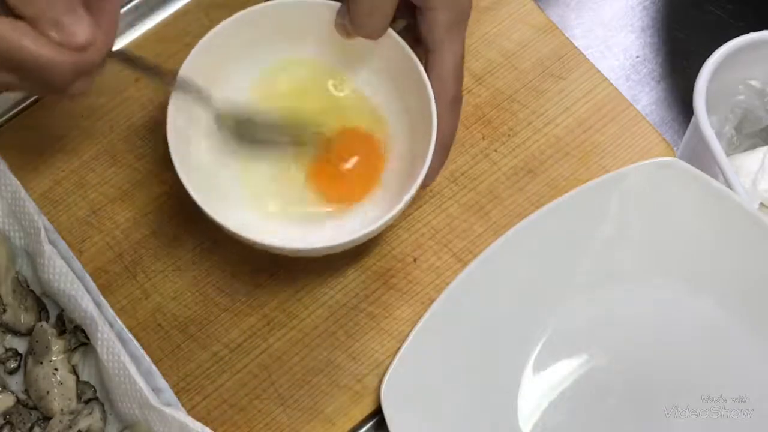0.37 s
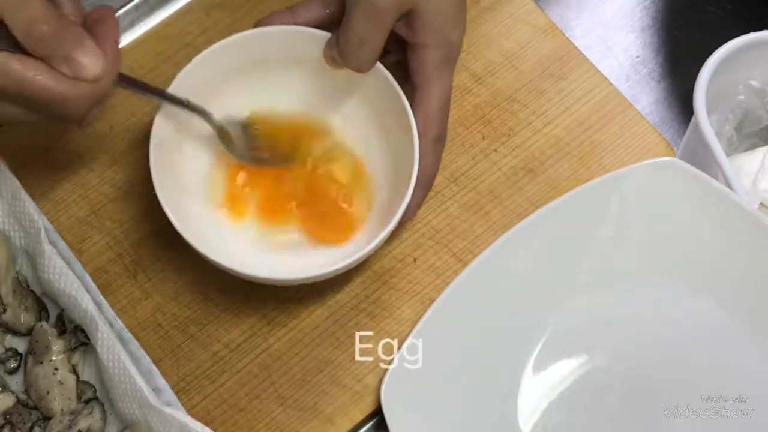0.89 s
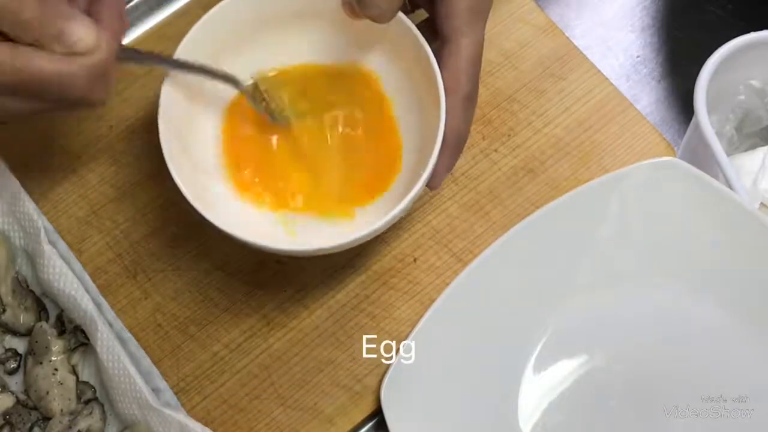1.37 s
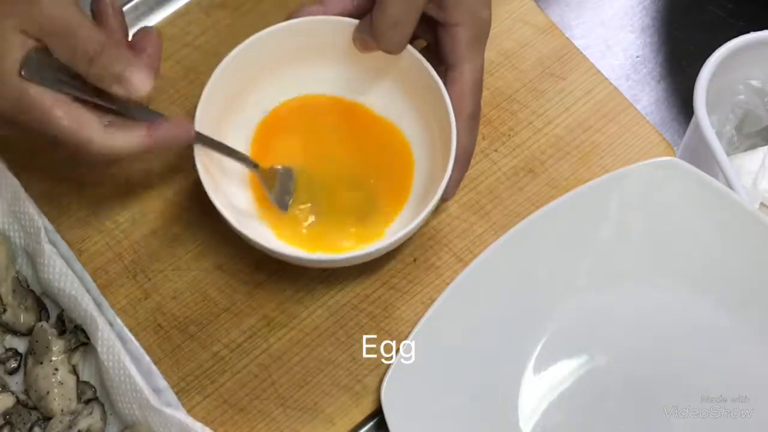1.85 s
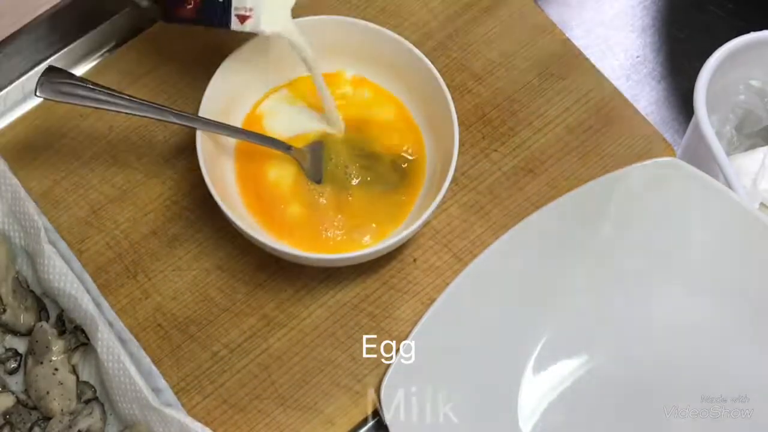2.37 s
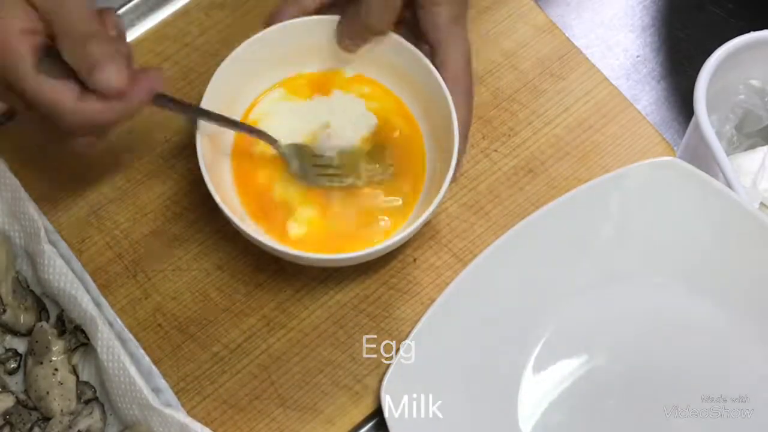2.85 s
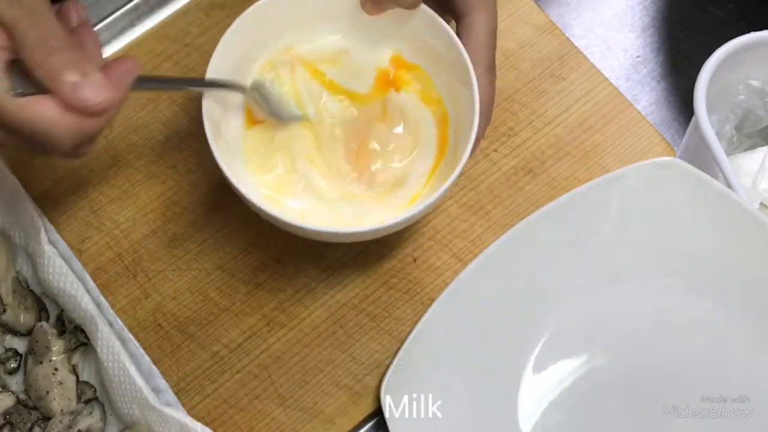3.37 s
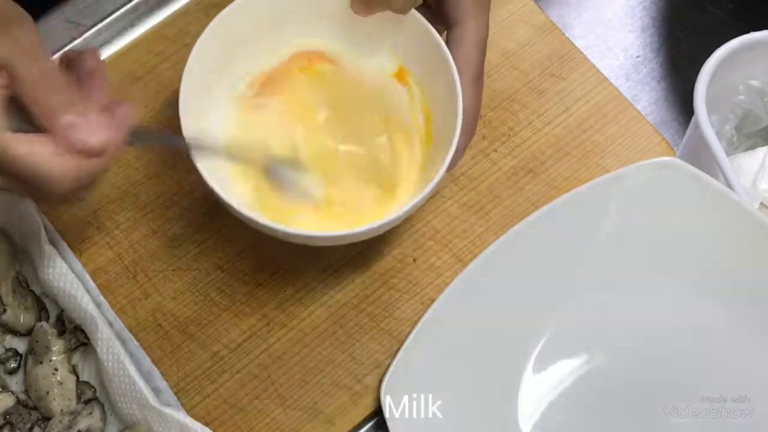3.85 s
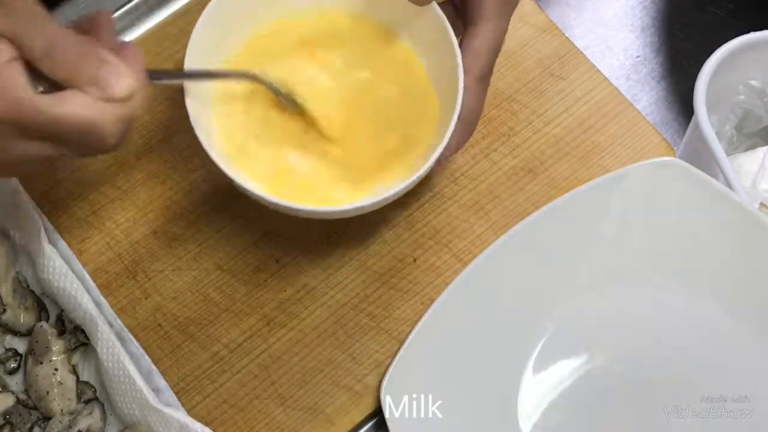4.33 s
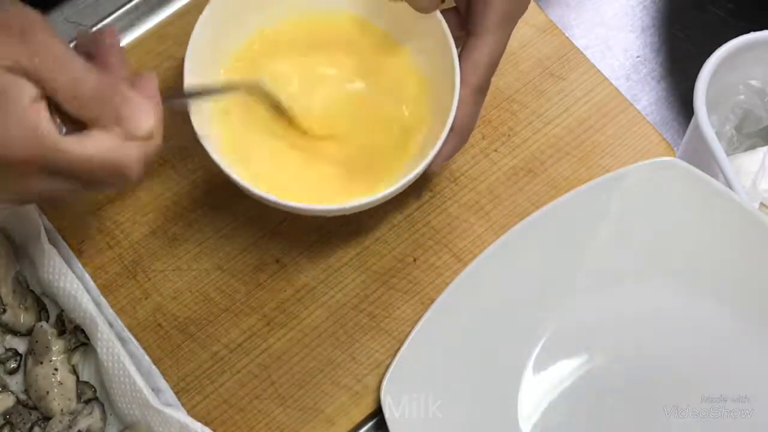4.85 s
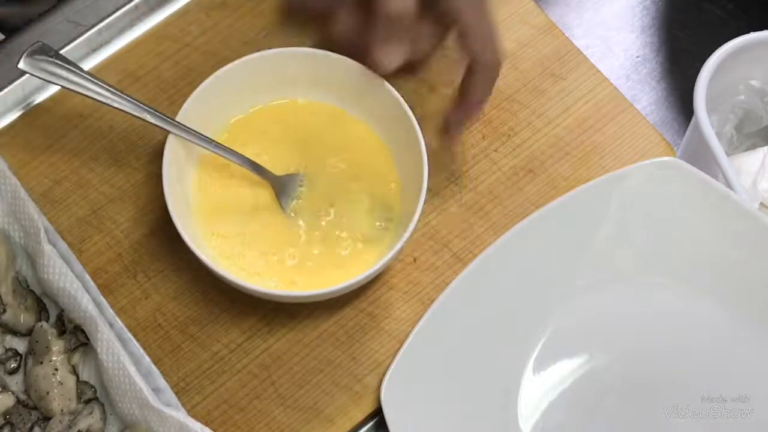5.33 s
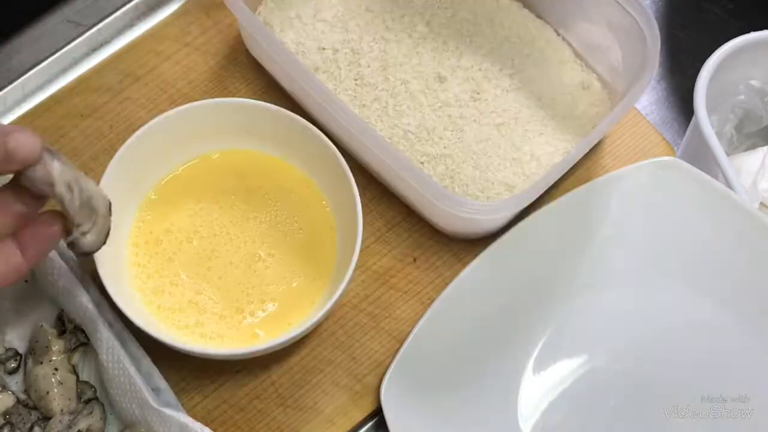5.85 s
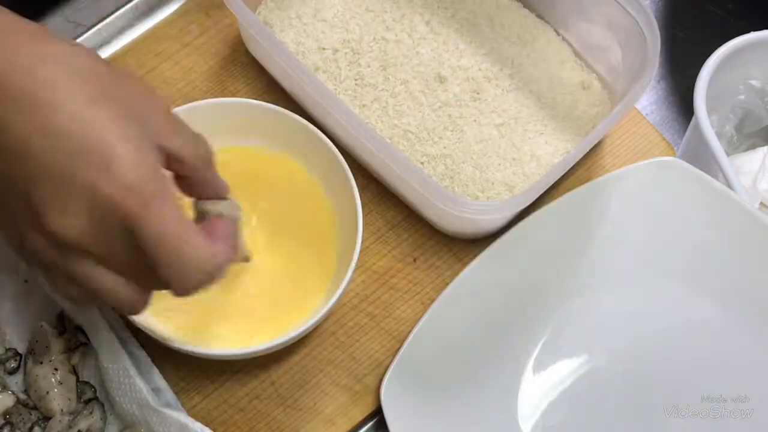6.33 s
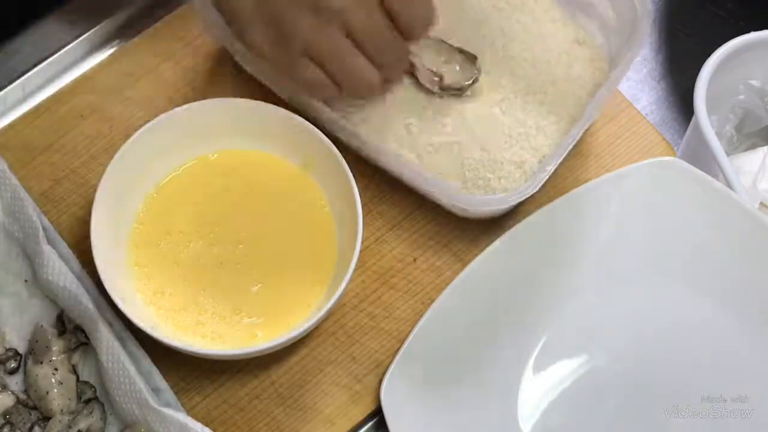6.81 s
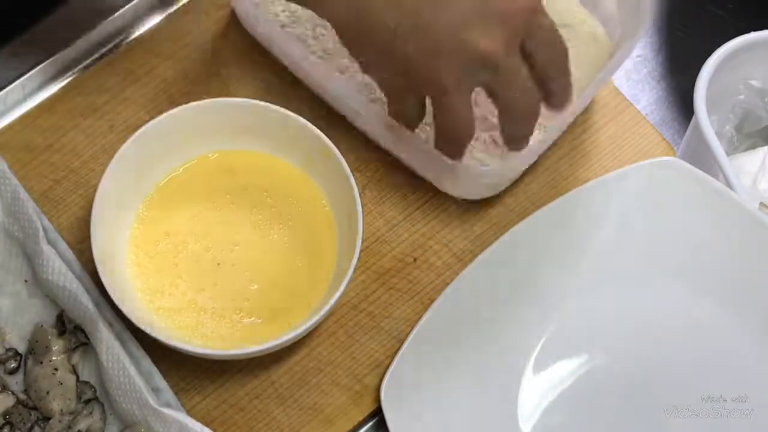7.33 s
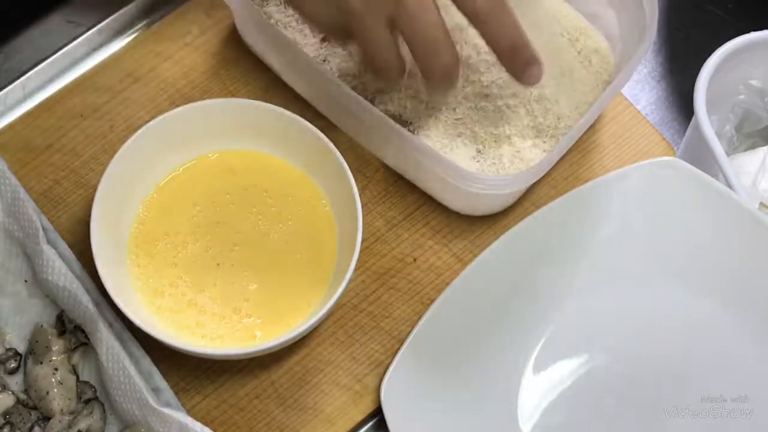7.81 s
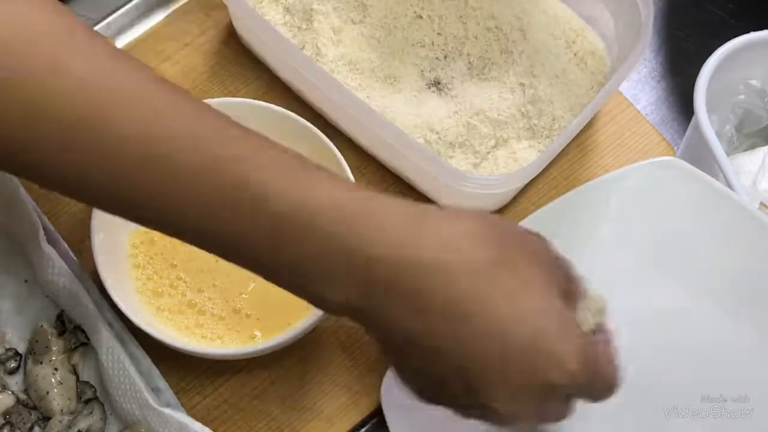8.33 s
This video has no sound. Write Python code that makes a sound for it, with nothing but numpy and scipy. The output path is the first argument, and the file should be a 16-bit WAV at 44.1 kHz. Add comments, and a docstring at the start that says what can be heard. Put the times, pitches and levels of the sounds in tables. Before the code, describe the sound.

Close, dry recording position over a wooden board: bright irregular fork ticks in a bowl, a couple of woody bowl knocks, a clink as the fork is let go. Quiet room hiss follows, then a short rim scrape and steady, rapid whisking with a low engine hum behind. It stops with a ringing clink and knock. The background becomes quieter, with small plastic thuds and light gritty crumb movements towards the end.

```python
"""In a kitchen, a fork whisks egg in a ceramic bowl on a wooden board: quick tine taps and a few bowl knocks.
Struck objects are decaying sines plus noise; a plastic tub then knocks, and crumbs slide as clumped grains.
Shaped noise makes the low rumble and ridged hiss; their colour and level switch at set moments.
A distant engine hums and briefly whines; low bumps are short decaying sines, some of them soft clicks
close to those switches."""
import sys
import numpy as np
from scipy import signal
from scipy.fft import rfft, irfft
from scipy.io import wavfile

SR = 44100
rng = np.random.default_rng(int(sys.argv[2]) if len(sys.argv) > 2 else 0)


def put_to_file(sound):
    """Save the sound as 16-bit audio at rate SR, in the file named by the first command-line argument."""
    columns = np.atleast_2d(sound).T  # one column per channel
    safe = np.clip(columns, -1, 1)
    whole_steps = np.round(safe * 32767)
    wavfile.write(sys.argv[1], SR, whole_steps.astype(np.int16))


def natural_amplitude(level_db):
    """Convert a level in decibels to a linear amplitude factor, elementwise."""
    exponent = np.asarray(level_db, float) / 20
    return 10 ** exponent


N = 382788
FREQ = np.maximum(np.fft.rfftfreq(N, 1 / SR), 1)

# tines on ceramic, levels before mixing: start_s, loudest_ring_hz, bowl_wall_db, fork_neck_db, tine_tips_db
TAPS = [(0.1984, 6300, -90, -44.5, -59), (0.211, 5320, -55, -44.5, -43.5), (.243, 11100, -82, -63, -43),
        (0.302, 7900, -57, -36.5, -50), (.393, 5700, -56, -35.5, -37), (0.4736, 6080, -70, -39.5, -42),
        (.478, 5200, -90, -41, -41), (0.4954, 7900, -71, -46.5, -62), (0.53, 3670, -51, -44.5, -75),
        (0.553, 5570, -62, -43.5, -44), (0.6317, 7200, -57, -44, -37), (0.6497, 9250, -63, -49, -62),
        (0.7101, 7680, -69, -37, -45), (0.784, 7900, -53, -42, -40), (0.865, 5820, -67, -43, -44),
        (0.9444, 5940, -61, -47.5, -35), (1.03, 9900, -85, -43.5, -45), (1.102, 8070, -68, -40.5, -37),
        (1.1185, 12600, -39.5, -36.5, -27), (1.121, 14900, -63, -48, -37), (1.2046, 2010, -40, -52, -64),
        (1.2115, 4110, -57, -28.5, -19), (1.233, 11020, -53, -35.5, -51), (1.3242, 15300, -36.5, -33, -28),
        (1.4225, 13400, -75, -54, -43), (1.4237, 2064, -36.5, -57, -37), (1.4291, 7900, -56, -29.5, -23),
        (1.43, 4090, -37.5, -29.5, -45), (1.44, 12800, -59, -53, -32), (1.5291, 2030, -39.5, -50, -77),
        (1.54, 2700, -52, -54, -38), (1.5498, 12340, -41.5, -33.5, -28), (1.6391, 7700, -41, -28.5, -18),
        (1.655, 4050, -56, -32, -34), (1.7352, 3950, -48, -53, -73), (1.7483, 4120, -49, -36, -25),
        (2.0098, 4740, -28.5, -31.5, -19), (2.035, 8340, -44, -56, -30), (2.04, 8550, -43, -35, -40),
        (2.7151, 3010, -43, -45.5, -41.5), (2.988, 6060, -76, -32.5, -29.5),
        (3.0775, 6000, -55, -39.5, -37), (3.1466, 5480, -49.5, -35.5, -32), (3.227, 9400, -48, -39.5, -38),
        (3.237, 4840, -65, -36.5, -35), (3.309, 5780, -79, -37, -30.5), (3.316, 4160, -62, -46, -57),
        (3.3625, 6070, -33.5, -30.5, -20), (3.379, 6200, -80, -37.5, -30), (3.3905, 5120, -78, -49, -39),
        (3.4647, 5640, -61, -39.5, -36), (3.539, 5700, -81, -29.5, -32), (3.6055, 5860, -72, -46.5, -74),
        (3.6182, 5680, -51, -34.5, -27.5), (3.696, 7750, -48, -35.5, -36), (3.754, 5400, -68, -51.5, -70),
        (3.7695, 8600, -74, -35.5, -31), (3.7788, 5380, -69, -36, -50), (3.7989, 1770, -38.5, -67, -66),
        (3.839, 4100, -61, -45, -62), (3.853, 5570, -73, -40, -65), (3.8554, 4900, -48, -54, -48),
        (3.903, 3250, -66, -46, -56), (3.9222, 9000, -56, -36.5, -29), (3.93, 4550, -62, -38, -60),
        (3.955, 3770, -58, -59, -66), (3.9914, 2580, -47.5, -36, -34), (4.0034, 5400, -82, -46, -42),
        (4.005, 6860, -66, -55, -46), (4.0446, 3020, -41.5, -39, -40), (4.0585, 3750, -50, -26, -29),
        (4.0664, 4950, -61, -51, -54), (4.131, 4750, -40, -37.5, -56), (4.1403, 5820, -38, -28.5, -32),
        (4.2159, 2980, -45, -30.5, -41), (4.227, 5340, -41, -29.5, -35), (4.297, 3820, -52, -45, -65),
        (4.3051, 5340, -42.5, -29, -41), (4.383, 3540, -44, -36, -30), (4.396, 5020, -45, -32, -34),
        (4.4628, 3430, -43, -32.5, -65), (4.478, 8000, -41, -32.5, -37), (4.4705, 2030, -51, -60, -70),
        (4.568, 5820, -41, -37, -38), (4.6525, 5670, -43.5, -36, -42), (4.741, 5340, -37.5, -39, -40),
        (4.8, 3500, -46, -54, -75), (4.8177, 3920, -48, -28.5, -46), (4.899, 5700, -40, -33, -41),
        (4.9819, 3990, -64, -33.5, -46), (5.12, 3640, -46, -37, -49), (5.138, 3800, -44.5, -49, -64),
        (5.202, 11070, -39, -35, -31), (5.2102, 3800, -36, -30, -29), (5.2814, 5100, -70, -49.5, -70),
        (5.3, 5100, -70, -55, -65)]
# centres of the tap bands: wall, two of the neck, tips: band_hz
TAP_BANDS_HZ = [2400, 5000, 9000, 13500]
# rings of fork and wet bowl at normal pitch: pitch_hz, relative_db, t60_s
FORK_BOWL_RINGS = [(2136, -1, 0.02814), (2700, -1.5, 0.029), (3025, 6, 0.049), (3500, 0.5, 0.045),
                   (3840, 2.5, 0.0061), (4740, -0.5, 0.037), (5340, 0.5, 0.047), (5620, -6, 0.06),
                   (6080, 6.5, 0.012), (7200, 0, 0.039), (7900, 8, 0.031), (9000, 7.5, 0.0092),
                   (9520, 2, 0.0343), (10080, -8, 0.022), (11150, -9, 0.042), (12400, 5.5, 0.013),
                   (12840, -6, 0.026), (12600, -4, 0.011), (15500, 5, 0.015), (17100, 2.5, 0.028),
                   (20280, 3.5, 0.027)]
# fork falling free against the rim and bouncing: start_s, low_rings_db, middle_ring_db, top_ring_db
FORK_DROPS = [(2.0092, -54, -43, -45), (2.039, -47, -52, -54), (5.203, -31, -35, -50),
              (5.2113, -38, -44, -52), (5.2238, -39, -44.5, -48.5), (5.233, -50.5, -46.5, -61.5),
              (5.2814, -59, -70, -65), (5.2985, -66, -71, -63)]
# borders between the low, middle and top rings of the free fork: border_hz
FORK_REGISTERS_HZ = [8500, 13000]
# rings of the fork out of the hand, at normal pitch: pitch_hz, relative_db, t60_s
FREE_FORK_RINGS = [(2310, -9, .14), (3130, -4, .05), (3650, 0, .06), (5200, -8, .04), (6150, -2, .05),
                   (11150, 2, .1), (11400, 0, .07), (16930, 3, .12)]
# board knock that comes with each tap, by knock band: relative_to_neck_db
THROUGH_BOWL_DB = [-37, -34.5, -29.5, -29.5, -34]

# bowl on board: start_s, thud_db, hardness_db_per_octave, foot_db, foot_ring_hz
BOWL_KNOCKS = [(0.109, -55.5, -4, -45.5, 2450), (0.803, -34, 6, -8, 2420), (1.917, -31.5, 4, -9.5, 1880),
               (2.011, -57, -1, -36, 2230), (2.043, -57.5, -5.5, -44, 1833), (2.8436, -51.5, 12, -28, 1400),
               (2.989, -55.5, 6, -48, 1100), (5.2196, -33.5, 4, -7.5, 2570),
               (5.279, -48.5, -2.5, -60, 2400), (5.29, -51, 0, -62, 2400)]
# rings of the board at normal pitch: pitch_hz, relative_db, t60_s
BOARD_RINGS = [(153.4, 5.5, 0.14), (280.6, -2.5, 0.26), (509.4, 9, 0.1), (814, -6, 0.033), (938, 5, 0.039),
               (1075, 4, 0.036), (1432, -15.5, 0.087), (2450, -12, 0.1), (3670, -6.5, 0.03)]
# plastic tub: start_s, thud_db, hardness_db_per_octave, click_db
TUB_KNOCKS = [(6.537, -55.5, 1, -56.5), (6.856, -71, -2, -59), (6.989, -36, 0.5, -40),
              (7.3874, -66, 17, -45.5), (7.408, -39, 4, -46.5), (7.434, -64, -3, -47),
              (7.597, -55, 0.5, -65), (8.633, -53.5, -5, -79)]
# rings of the tub: pitch_hz, relative_db, t60_s
TUB_RINGS = [(250, -1, .11), (441, 0, .08), (777, 2, .05), (1077, -6, .06), (1421, -2, .05),
             (1744, -8, .05), (2708, -8, .04), (3400, -3, .035), (4200, -8, .035)]
# centres of the knock bands, three for the thud and two for the click: band_hz
KNOCK_BANDS_HZ = [180, 530, 1100, 2400, 6500]
# colour of each knock in the three thud bands and two click bands: relative_db
BOWL_THUD_DB, BOWL_CLICK_DB = [-2, -2, -2], [-15, -20]
TUB_THUD_DB, TUB_CLICK_DB = [-5.5, -5, -5], [1.5, -2.5]

# low bumps and soft clicks, before the bass cut: start_s, level_db, pitch_hz, t60_s
BUMPS = [(.42, -65, 356, 0.3), (.49, -57.5, 356, 0.24), (2.008, -41, 385, 0.092), (2.019, -44.5, 214, 0.2),
         (2.035, -47, 343, 0.2), (2.1, -57, 350, 0.12), (2.099, -56, 213, 0.18), (2.215, -61, 35, 0.065),
         (2.866, -27.5, 66, 0.11), (2.8947, -15, 132, 0.01), (4.015, -65, 40, 0.052),
         (5.55, -56, 80, 0.079), (7.6, -51, 245, 0.18), (8.055, -62.5, 34.7, 0.052)]
# crumbs sliding, before clumping: start_s, gather_s, hold_s, peak_db
CRUMBS = [(7.044, 0.019, 0.025, -65), (7.088, 0.012, 0.09, -61), (7.184, .02, 0.065, -68.5),
          (7.431, 0.029, 0.013, -57), (7.576, 0.015, 0.005, -51.5), (7.717, 0.013, 0.041, -69.5),
          (7.767, 0.0092, 0.0076, -60.5), (7.785, 0.0089, 0.011, -58.5), (7.887, 0.029, 0.032, -54.5),
          (7.966, 0.019, 0.031, -73.5), (8.047, 0.0064, 0.0037, -59)]
# spectrum of the crumbs: frequency_hz, relative_density_db_per_hz
CRUMB_COLOUR = [(600, -24), (1200, -13.5), (1490, -8), (2500, -9), (3000, 0.5), (3800, -5.5), (4800, -1.5),
                (6200, -6), (13000, -8.5), (16000, -8.5)]

# the far engine revs: time_s, pitch_hz, level_db
WHINE = [(4.6, 1200, -90), (4.85, 1225, -73), (5.15, 1265, -73), (5.57, 1330, -76)]
# borders between the deep, low, upper and hiss registers: border_hz
ROOM_EDGES_HZ = [110, 800, 3300]
# smooth spectrum of the background: frequency_hz, relative_density_db_per_hz
ROOM_COLOUR = [(15, -68), (45, -42.5), (110, -11), (156, -5.5), (291, 0), (391, -0.5), (586, -7),
               (1500, -13), (2320, -22.5), (3290, -30.5), (5060, -32.5), (6990, -33.5), (15700, -35)]
# ridges, one list for each background stretch: centre_hz, lift_db
RIDGES = [
    [(150, 11), (5964, 5.5), (6782, 9), (8807, 5), (10766, 6.5), (12450, 7)],
    [(3165, 9), (5200, 9), (5900, 7.5), (6589, 4.5), (8161, 10.5), (8570, 6.5), (14556, 3)],
    [(172, 6), (5792, 7.5), (7041, 12), (7859, 5), (8850, 6.5), (10850, 7), (11498, 2.5), (12510, 4)],
    [(172, 3.5), (2130, 14), (2350, 11), (7062, 4.5), (7256, 4.5), (7838, 0), (10766, 1)],
    [(258, 6), (775, 5), (2304, 12), (4900, 4), (6200, -5), (7062, 7.5), (7730, 7), (8500, -3.5),
     (9700, 10), (10500, -1.5), (11283, 8), (12123, 10), (13120, 5), (13900, -3.5)],
    [(193, 10), (1593, 4.5), (5426, 5), (6782, 6.5), (7062, 8.5), (9151, 7), (12700, 8), (13329, 7)],
]
# narrow hums of a distant engine in the rumble: pitch_hz, lift_db
HUMS = [(152, 5), (207, 6.1), (290, 6.2), (480, 12), (575, 11.2), (665, 4.5)]
# background stretches, levels before wander: start_s, deep_db, hiss_db
STRETCHES = [(0.002, -78, -66), (.9, -66.5, -65.5), (2.219, -69, -66.5), (4.018, -68.5, -63.5),
             (5.574, -105, -72.5), (8.06, -81, -70.5)]
# swell of the distant rumble, used around its own mean: time_s, level_db
RUMBLE = [(0.0, -66), (0.6, -67), (1.93, -69), (2.64, -69), (2.95, -55.5), (3.55, -64), (3.92, -57.5),
          (4.3, -64.5), (5.15, -62), (5.44, -61.5), (5.58, -60), (5.7, -71), (6.89, -69.5), (7.2, -70),
          (7.52, -70), (7.98, -69.5), (8.24, -70), (8.68, -68.5)]
# low and upper rumble: mean_db, share of the swell; wander of all four registers: rms_db
RUMBLE_MEAN_DB, RUMBLE_SHARE, WANDER_DB = [-68, -78], [0.97, 0.64], [3.0, 2.4, 0.31, 0.31]
# brief dip in level: start_s, end_s
DIP_S = (4.009, 4.019)

# between these moments the fork, bowl and board modes are lower by this ratio and ring longer
SLOW_S, SLOW_RATIO = (.9, 2.22), .76
# ring cluster on the half-dry bowl, then once milk floods it: pitch spread (share), t60 (s)
FLOODED_S = 2.8
CLUSTER_SPREAD, CLUSTER_T60_S = (.045, .08), (.036, .028)


def rms_one(x):
    """Scales to unit rms."""
    return x / np.sqrt(np.mean(x ** 2) + 1e-20)


def in_time(rows):
    """Draws curve columns as sample-rate lines."""
    s, *columns = np.transpose(rows)
    return [np.interp(np.arange(N) / SR, s, column) for column in columns]


def at_hz(points, hz):
    """Reads a spectrum on a log-frequency axis."""
    point_hz, point_db = np.transpose(points)
    return np.interp(np.log(hz), np.log(point_hz), point_db)


def coloured(gain):
    """Fresh white noise with the given gain at each frequency."""
    return irfft(rfft(rng.standard_normal(N)) * gain, N)


def filtered(x, order, hz, kind):
    """Butterworth filter with the given edges in Hz."""
    return signal.sosfilt(signal.butter(order, hz, kind, fs=SR, output="sos"), x)


def add(out, s, piece):
    """Mixes a short sound in at time s."""
    i = round(s * SR)
    out[i:i + len(piece)] += piece[:N - i]


def is_slow(times):
    """Marks the moments when rings are lower and longer."""
    return (times > SLOW_S[0]) & (times < SLOW_S[1])


def ring(clicks, hz, t60):
    """A two-pole resonator: a unit click starts a decaying sine."""
    r, w = natural_amplitude(-60 / (t60 * SR)), 2 * np.pi * hz / SR
    return signal.lfilter([0, np.sin(w)], [1, -2 * r * np.cos(w), r * r], clicks + 1e-18)


def ping(hz, t60, rise_s):
    """One sine that swells briefly and decays."""
    t = np.arange(round(t60 * SR)) / SR
    return np.sin(2 * np.pi * hz * t) * natural_amplitude(-60 * t / t60) * (1 - np.exp(-t / rise_s))


def swell(start, rise_s, hold_s, peak_db, fall_db_per_s):
    """Enters 29 dB under its peak, rises, holds, then fades evenly in dB."""
    t = np.arange(N) / SR - start
    rise_db = -29 * np.maximum(1 - t / rise_s, 0)
    fall_db = -fall_db_per_s * np.maximum(t - rise_s - hold_s, 0)
    return (t > 0) * natural_amplitude(peak_db + rise_db + fall_db)


def grains(per_s, size_db):
    """Random clicks of uneven size."""
    sizes = natural_amplitude(size_db * np.minimum(rng.exponential(1, N), 5)) * rng.choice([-1, 1], N)
    return rms_one(sizes * (rng.random(N) < per_s / SR))


def struck(times, levels_db, bands_hz, modes, mode_db, spread_db, crack_db, crack_s, tail_db, tail_s,
           top_lag_s=0):
    """Each blow rings every mode at the level of its band, cracks, and leaves noise dying band by band."""
    at, out = np.round(times * SR).astype(int), np.zeros(N)
    chance = np.minimum(rng.standard_normal((len(at), len(modes))), 1)
    slow = is_slow(times)
    for ratio, chosen in [(1, ~slow), (SLOW_RATIO, slow)]:
        for k, (hz, own_db, t60) in enumerate(modes):
            band_db = np.array([np.interp(np.log(hz * ratio), np.log(bands_hz), row) for row in levels_db])
            blow_db = band_db + own_db + mode_db + spread_db * chance[:, k]
            clicks = np.zeros(N)
            clicks[at] = chosen * natural_amplitude(blow_db) * (-1) ** k
            out += ring(clicks, hz * ratio, t60 / ratio)
    middles = np.sqrt(np.multiply(bands_hz[1:], bands_hz[:-1]))
    edges = [bands_hz[0] ** 2 / middles[0], *middles, min(bands_hz[-1] * 2, .4 * SR)]
    for k, hz in enumerate(bands_hz):
        lag = round(top_lag_s * SR) * (hz == bands_hz[-1])   # the bright rattle follows the blow
        clicks = np.zeros(N)
        clicks[at + lag] = natural_amplitude(levels_db[:, k])
        longer = (3000 / hz) ** 0.45   # lows outlast highs
        shape = np.zeros(N)
        for db, t60 in [(crack_db, crack_s), (tail_db, tail_s)]:
            decay = natural_amplitude(-60 / (t60 * longer * SR))
            shape += natural_amplitude(db) * signal.lfilter([1], [1, -decay], clicks + 1e-18)
        noise = filtered(shape * rng.standard_normal(N), 2, edges[k:k + 2], "band")
        out += noise * np.sqrt(SR / 2 / (edges[k + 1] - edges[k]))   # makes up for the narrow band
    return out


def tap_levels(rows):
    """Level of each tap in each band: wall below, tips above, the neck strongest near the loudest ring."""
    loudest_hz = rows[:, 1:2]
    focus_hz = np.where(loudest_hz > 11000, 6220, loudest_hz)   # taps on the tips leave the neck near even
    away_octaves = np.abs(np.log2(np.array(TAP_BANDS_HZ[1:3]) / focus_hz))
    neck_db = rows[:, 3:4] - 7 * (away_octaves - away_octaves.min(axis=1, keepdims=True))
    return np.hstack([rows[:, 2:3], neck_db, rows[:, 4:5]])


def scattered_rings(rows, tap_db):
    """Scattered short rings at random pitches after each tap, the later ones weaker."""
    out = np.zeros(N)
    scatter = rng.random((len(rows), 10, 3))
    for s, band_db, rings in zip(rows[:, 0], tap_db, scatter):
        for pitch, late, weak in rings:
            hz = 2000 * 7.5 ** pitch
            level_db = np.interp(np.log(hz), np.log(TAP_BANDS_HZ), band_db) - 6 - 12 * weak - 14 * late
            add(out, s + .028 * late, natural_amplitude(level_db) * ping(hz, .02, rise_s=.0004))
    return out


def ring_clusters(rows, tap_db):
    """The struck spot lifts one ring, which wet ceramic splits into a rough cluster."""
    out = np.zeros(N)
    scatter = rng.standard_normal((len(rows), 6, 2))
    for s, hz, band_db, cluster in zip(rows[:, 0], rows[:, 1], tap_db, scatter):
        local_db = np.interp(np.log(hz), np.log(TAP_BANDS_HZ), band_db)
        wet = int(s > FLOODED_S)
        t60 = CLUSTER_T60_S[wet]
        add(out, s, natural_amplitude(local_db - 2) * ping(hz, t60, rise_s=.0005))
        for off, late in cluster:
            part = ping(hz * (1 + CLUSTER_SPREAD[wet] * off), t60, rise_s=.0012)
            add(out, s + .004 * late ** 2, natural_amplitude(local_db - 5 - 3 * late ** 2) * part)
    return out


def fork():
    """Tine taps ring fork and bowl, bounce weakly on another tine, and knock the board faintly."""
    rows = np.array(TAPS)
    start_s, neck_db, tap_db = rows[:, 0], rows[:, 3:4], tap_levels(rows)
    chance = rng.random((len(rows), 4))
    bounce_s = start_s + 0.0016 + 0.0093 * chance[:, 0]
    bounce_db = tap_db - 9 - 9 * chance[:, 1:2]
    brush_s = start_s + 0.036 + 0.055 * chance[:, 2]   # a dull brush as the fork sweeps on
    brush_db = tap_db - [24, 89.6, 36.3, 30] - 14 * chance[:, 3:]
    out = struck(np.concatenate([start_s, bounce_s, brush_s]), np.concatenate([tap_db, bounce_db, brush_db]),
                 TAP_BANDS_HZ, FORK_BOWL_RINGS, mode_db=-16.5, spread_db=6,
                 crack_db=-6.5, crack_s=0.008, tail_db=-24.5, tail_s=0.15)
    out += scattered_rings(rows, tap_db) + ring_clusters(rows, tap_db)
    knock = struck(start_s, neck_db + THROUGH_BOWL_DB, KNOCK_BANDS_HZ, BOARD_RINGS, mode_db=-12, spread_db=4,
                   crack_db=0, crack_s=0.0097, tail_db=-22.0, tail_s=0.0612)
    return knock + filtered(out, 4, 1600, "high")   # tines are too small for bass


def roughened(x, per_s):
    """Random level changes roughen the ring."""
    knots = np.arange(0, len(x) + SR / per_s, SR / per_s)
    return x * np.interp(np.arange(len(x)), knots, .5 + .8 * rng.standard_normal(len(knots)))


def dropped_fork():
    """Out of the hand the fork rings longer, at its own pitches, roughened by random level changes."""
    rows = np.array(FORK_DROPS)
    out = np.zeros(N)
    for (s, *levels_db), ratio in zip(rows, np.where(is_slow(rows[:, 0]), SLOW_RATIO, 1)):
        for hz, own_db, t60 in FREE_FORK_RINGS:
            register = np.searchsorted(FORK_REGISTERS_HZ, hz)
            level_db = levels_db[register] + own_db + 2 * rng.standard_normal()
            tone = ping(hz * ratio, t60 / ratio, rise_s=.0004)
            add(out, s, natural_amplitude(level_db) * roughened(tone, 350 * ratio))
    return out


def drag():
    """The fork is dragged off the rim: steel chatters over glaze, bright grit that also drives one ring."""
    grit = grains(15000, size_db=1.5)
    bright = filtered(grit, 2, 2000, "high")
    singing = natural_amplitude(3) * rms_one(ring(grit, 2300, .06))
    bite = swell(2.8645, rise_s=.002, hold_s=.008, peak_db=-40, fall_db_per_s=500)
    before_lift_off = np.arange(N) < 2.897 * SR
    return bite * before_lift_off * (bright + singing)


def knock_levels(rows, thud_db, click_db):
    """Level of each knock in each band: a thud tilted by its hardness below, a click above."""
    octaves = np.log2(np.array(KNOCK_BANDS_HZ[:3]) / KNOCK_BANDS_HZ[1])
    return np.hstack([rows[:, 1:2] + thud_db + rows[:, 2:3] * octaves, rows[:, 3:4] + click_db])


def bowl():
    """The bowl's foot knocks the board: a short ring, then the wood."""
    rows = np.array(BOWL_KNOCKS)
    levels_db = knock_levels(rows, BOWL_THUD_DB, BOWL_CLICK_DB)
    out = struck(rows[:, 0] + 0.00089, levels_db, KNOCK_BANDS_HZ, BOARD_RINGS, mode_db=-1.0, spread_db=2,
                 crack_db=-8.5, crack_s=0.062, tail_db=-24.0, tail_s=0.232, top_lag_s=0.0034)
    for s, _, _, foot_db, hz in rows:
        add(out, s, natural_amplitude(foot_db) * ping(hz, 0.0098, rise_s=0.00016))
    return filtered(out, 1, 10000, "low")   # a soft, wide contact


def tub():
    """Dull plastic knocks; the thin walls give no deep bass and no top treble."""
    rows = np.array(TUB_KNOCKS)
    levels_db = knock_levels(rows, TUB_THUD_DB, TUB_CLICK_DB)
    out = struck(rows[:, 0], levels_db, KNOCK_BANDS_HZ, TUB_RINGS, mode_db=-3, spread_db=2,
                 crack_db=-6.5, crack_s=0.044, tail_db=-27.5, tail_s=0.084)
    return filtered(out, 4, [160, 10000], "band")


def crumbs():
    """Thousands of dry grains a second, arriving in clumps; each slide has its own uneven colour."""
    colour = natural_amplitude(at_hz(CRUMB_COLOUR, FREQ))
    clump_knots = natural_amplitude(2.65 * rng.standard_normal(N // 250 + 1))
    clumps = np.interp(np.arange(N), np.arange(0, N, 250), clump_knots)
    patter, out = rfft(grains(7000, size_db=2.2)), np.zeros(N)
    shade_hz = np.geomspace(500, 16000, 40)
    for row in CRUMBS:
        shade_db = 3 * rng.standard_normal(40)
        shade = natural_amplitude(np.interp(np.log(FREQ), np.log(shade_hz), shade_db))
        out += swell(*row, fall_db_per_s=600) * rms_one(irfft(patter * colour * shade, N))
    return clumps * out


def bumps():
    """Short decaying low sines, some of them soft clicks close to the switches between stretches."""
    out = np.zeros(N)
    for s, level_db, hz, t60 in BUMPS:
        add(out, s, natural_amplitude(level_db) * ping(hz, t60, rise_s=0.23 / hz))
    return filtered(out, 2, 42, "high")


def kitchen(x, t60=0.1366, dull_hz=6000):
    """Dense early echoes dying fast off nearby hard surfaces."""
    t = np.arange(round(.4 * SR)) / SR
    echoes = rng.standard_normal(len(t)) * natural_amplitude(-60 * t / t60) * (t > .003)
    echoes = signal.lfilter(*signal.butter(1, dull_hz, fs=SR), echoes)
    return signal.fftconvolve(x, echoes / np.sqrt(np.sum(echoes ** 2)))[:N]


def whine():
    """The far engine revs: a wavering thin tone gliding up, with a broad wash an octave above."""
    hz, level_db = in_time(WHINE)
    t = np.arange(N) / SR
    heard = (t > WHINE[0][0]) & (t < WHINE[-1][0])
    phase = 2 * np.pi * np.cumsum(hz) / SR
    waver, wash = (rms_one(coloured(1 / (1 + (FREQ / width_hz) ** 2))) for width_hz in (6, 120))
    return heard * natural_amplitude(level_db) * (waver * np.sin(phase) + natural_amplitude(5) * wash * np.sin(2 * phase))


def ridged(ridges, width_hz):
    """Lift in dB at each frequency from a set of narrow ridges."""
    return sum(lift_db * np.exp(-((FREQ - hz) / width_hz(hz)) ** 2) for hz, lift_db in ridges)


def background():
    """Noise with ridges that switch by stretch; the rumble swells, and every register wanders in level."""
    t, noise = np.arange(N) / SR, np.zeros(N)
    starts, deep_db, hiss_db = np.transpose(STRETCHES)
    hums_db = ridged(HUMS, lambda hz: 15)
    for start, end, ridges in zip(starts, [*starts[1:], 99], RIDGES):
        lift_db = ridged(ridges, lambda hz: 40 + .02 * hz)
        if 2.12 < start < 5.475:   # the stretches in which the engine hums
            lift_db = lift_db + hums_db
        noise += coloured(natural_amplitude(at_hz(ROOM_COLOUR, FREQ) + lift_db)) * ((t >= start) & (t < end))
    now = np.maximum(np.searchsorted(starts, t) - 1, 0)
    rumble_db = in_time(RUMBLE)[0]
    swing_db = rumble_db - rumble_db.mean()
    rumbles_db = [db + share * swing_db for db, share in zip(RUMBLE_MEAN_DB, RUMBLE_SHARE)]
    levels_db = [deep_db[now], *rumbles_db, hiss_db[now]]
    edges, spectrum, out = [0, *ROOM_EDGES_HZ, SR], rfft(noise), np.zeros(N)
    for low, high, level_db, wander_db in zip(edges, edges[1:], levels_db, WANDER_DB):
        register = 1 / np.sqrt((1 + (low / FREQ) ** 8) * (1 + (FREQ / high) ** 8))
        wander = rms_one(coloured(1 / (1 + (FREQ / 5.5) ** 2)))   # slow, a few Hz
        out += natural_amplitude(level_db + wander_db * wander) * rms_one(irfft(spectrum * register, N))
    return out


def scene():
    """All sources at one microphone; all but the bumps dip briefly in level."""
    sources = fork() + dropped_fork() + bowl() + tub() + drag()
    near = filtered(sources, 3, 95, "high")   # small objects radiate little deep bass
    from_middle_s = np.abs(np.arange(N) / SR - np.mean(DIP_S))
    dip = np.clip(from_middle_s * 1000 - np.ptp(DIP_S) * 500, .05, 1)   # ramps of about a millisecond
    mix = near + natural_amplitude(-16.0) * kitchen(near) + crumbs() + whine() + background()
    return (mix * dip + bumps())[None]


def low_pass(x):
    """Removes everything above the highest recorded frequency."""
    return signal.sosfilt(signal.butter(12, 16820, fs=SR, output="sos"), x)


def record(dry):
    """The extreme treble is far weaker from 16 kHz, then cut from 17 kHz."""
    body = signal.sosfilt(signal.cheby2(12, 24, 16000, fs=SR, output="sos"), dry)
    cut = signal.sosfilt(signal.cheby2(10, 40, 17000, fs=SR, output="sos"), body)
    return low_pass(cut)


dry = scene()
out = record(dry)
put_to_file(out)
```